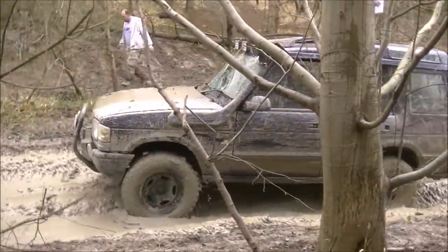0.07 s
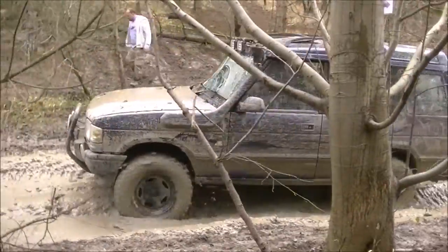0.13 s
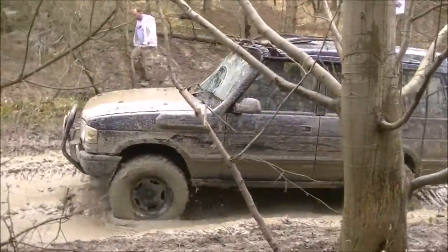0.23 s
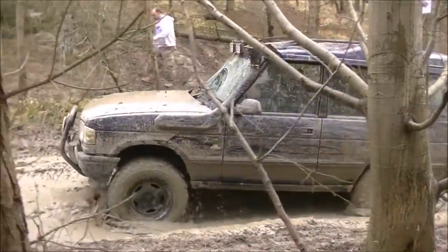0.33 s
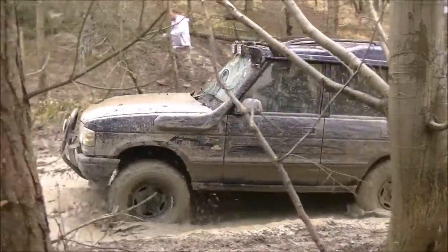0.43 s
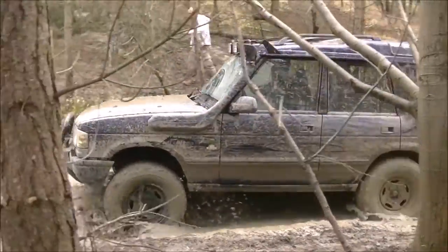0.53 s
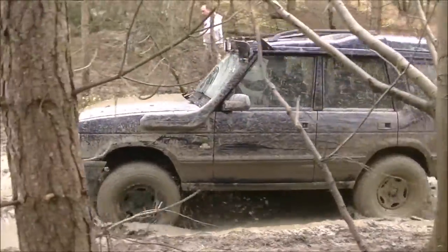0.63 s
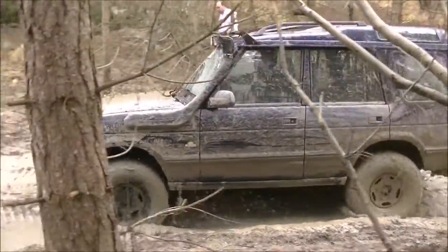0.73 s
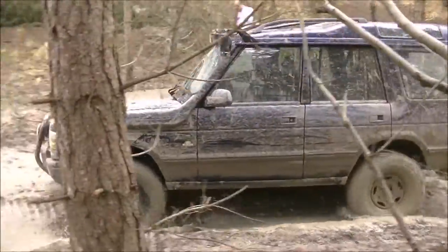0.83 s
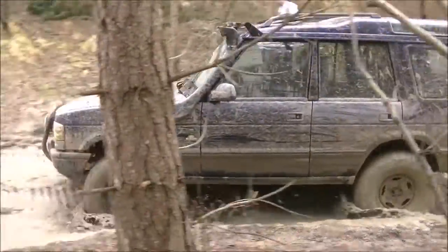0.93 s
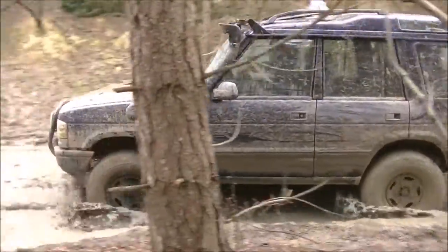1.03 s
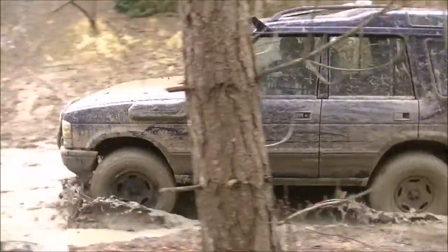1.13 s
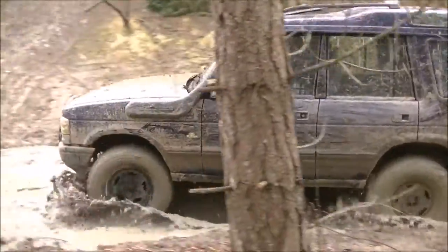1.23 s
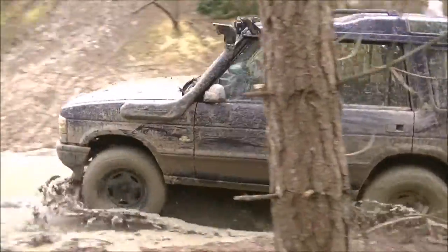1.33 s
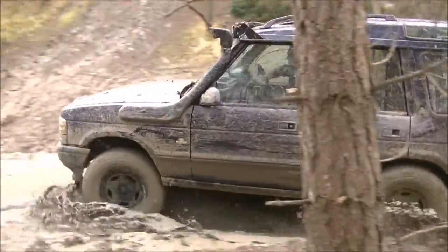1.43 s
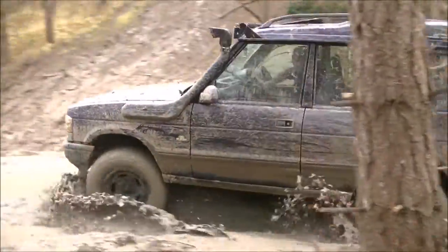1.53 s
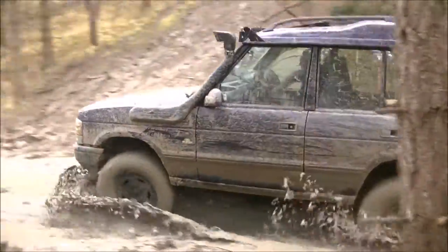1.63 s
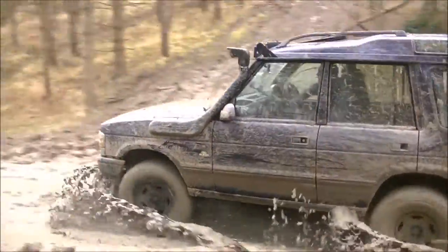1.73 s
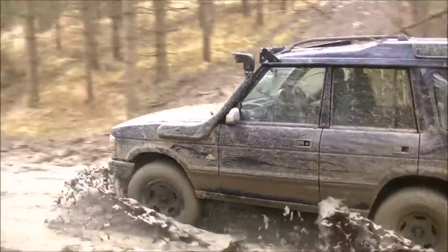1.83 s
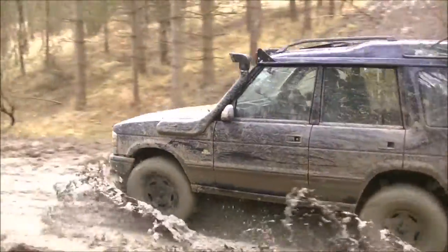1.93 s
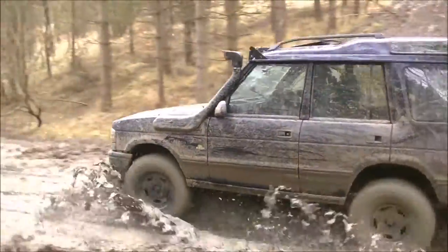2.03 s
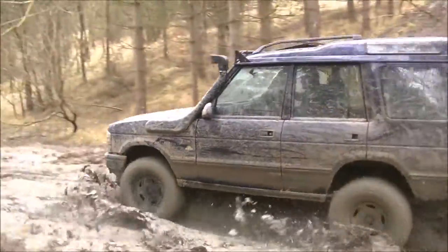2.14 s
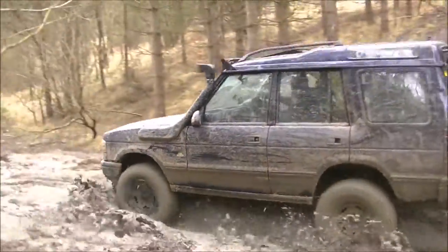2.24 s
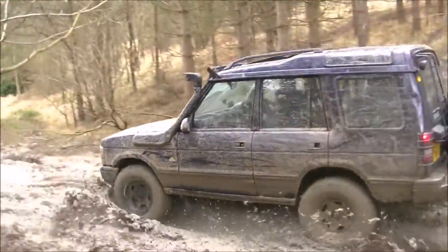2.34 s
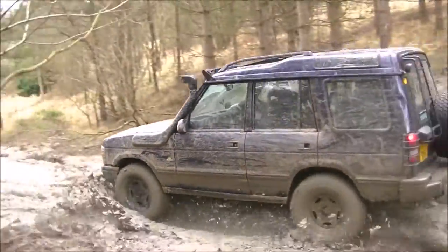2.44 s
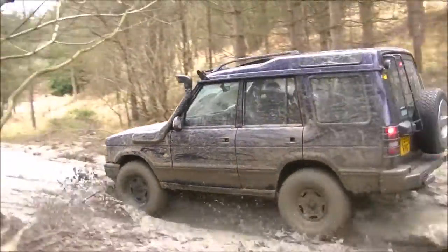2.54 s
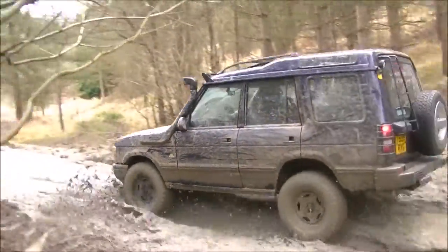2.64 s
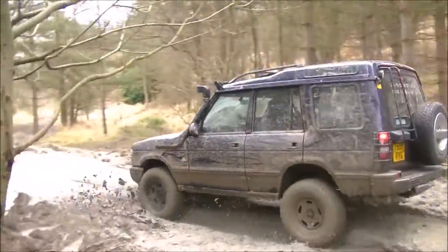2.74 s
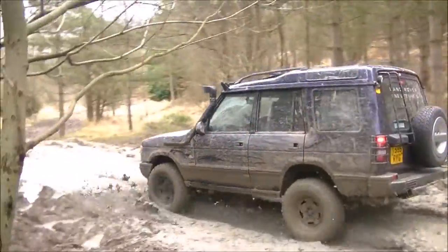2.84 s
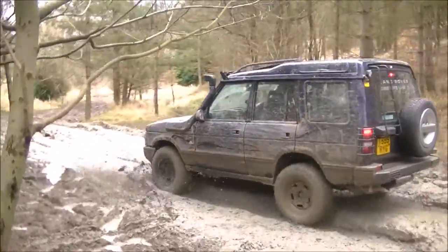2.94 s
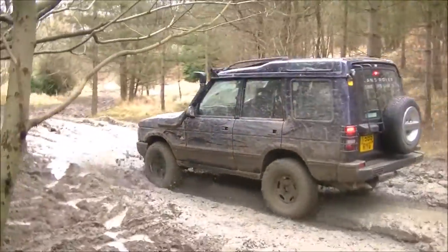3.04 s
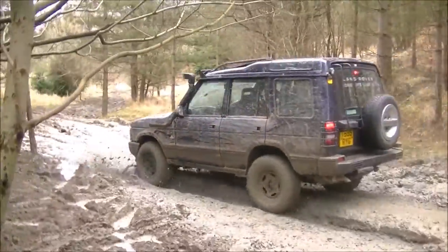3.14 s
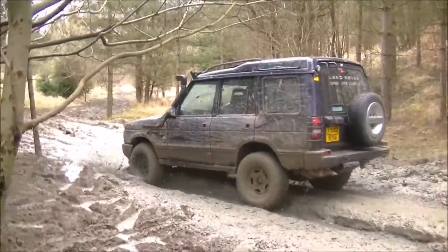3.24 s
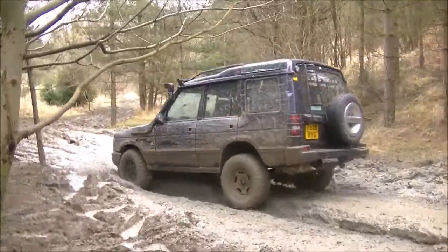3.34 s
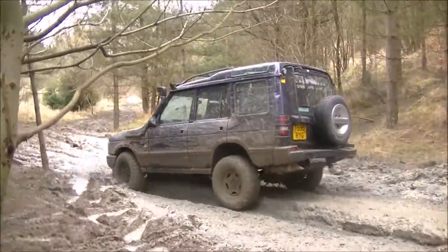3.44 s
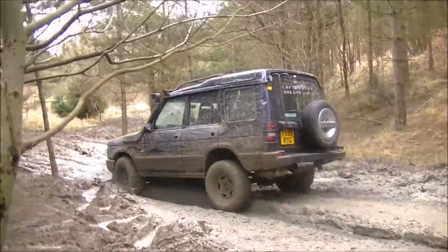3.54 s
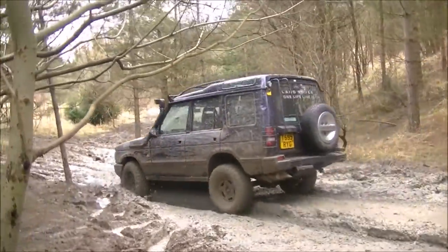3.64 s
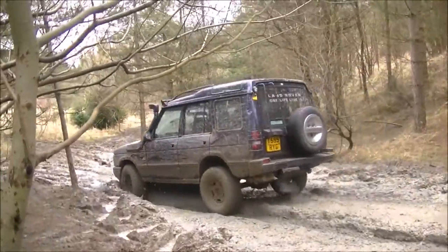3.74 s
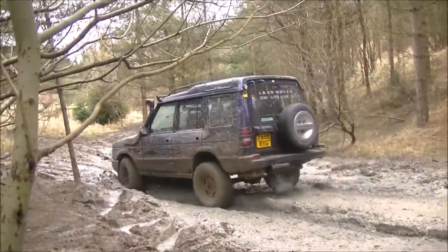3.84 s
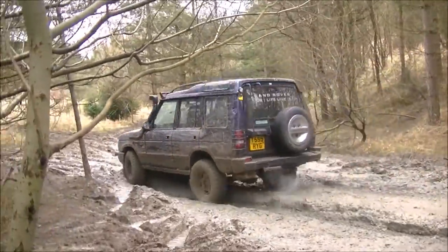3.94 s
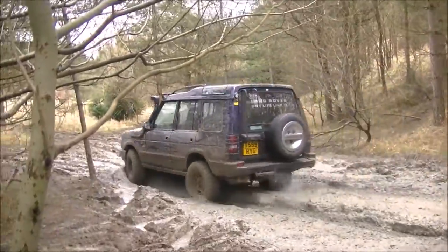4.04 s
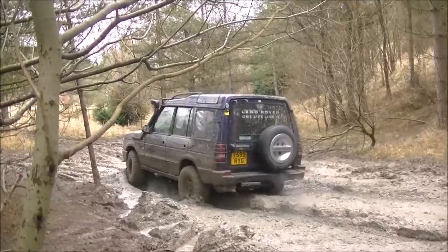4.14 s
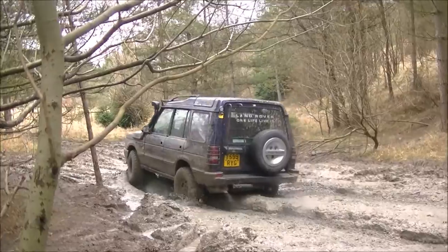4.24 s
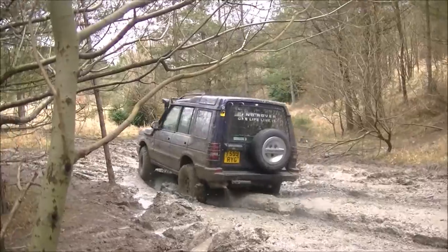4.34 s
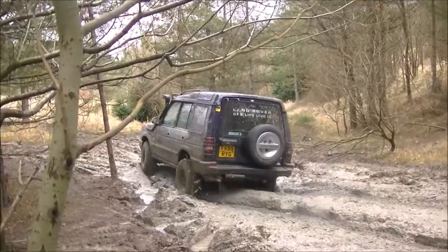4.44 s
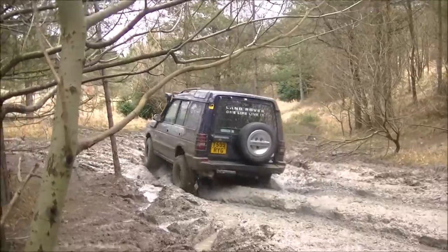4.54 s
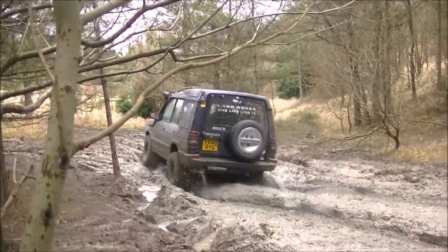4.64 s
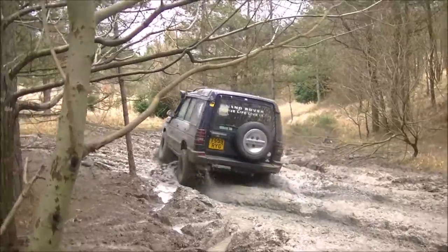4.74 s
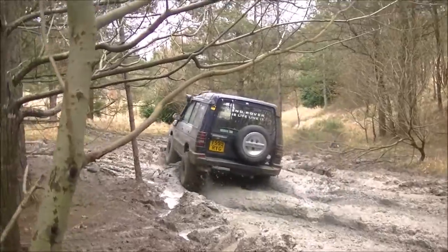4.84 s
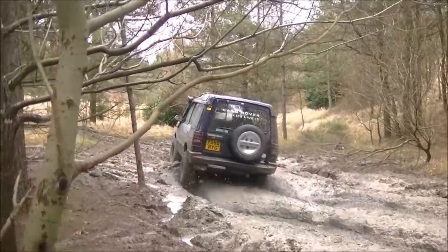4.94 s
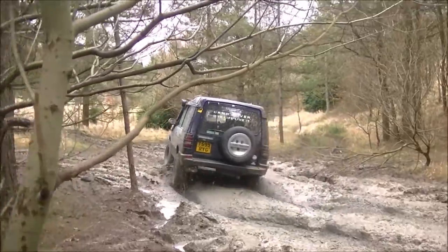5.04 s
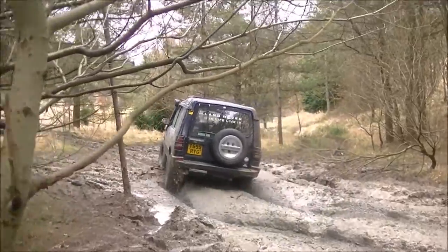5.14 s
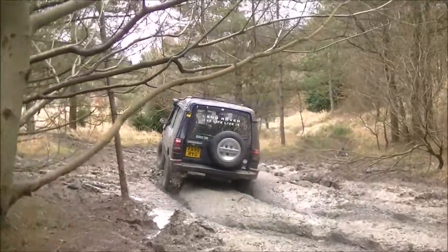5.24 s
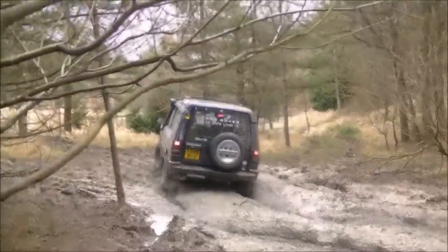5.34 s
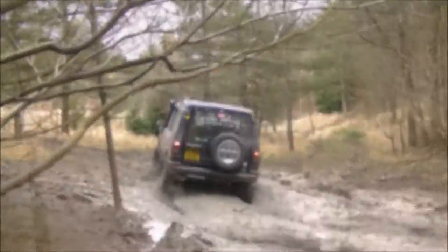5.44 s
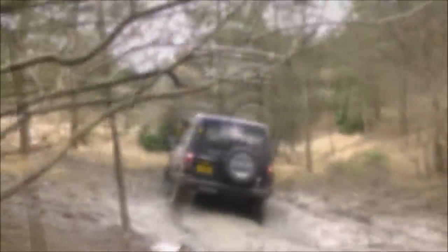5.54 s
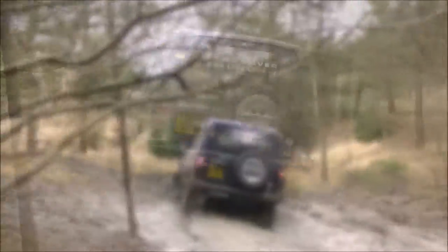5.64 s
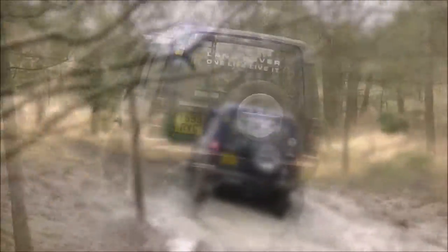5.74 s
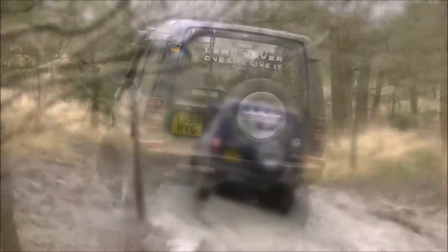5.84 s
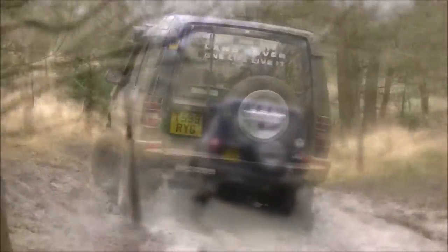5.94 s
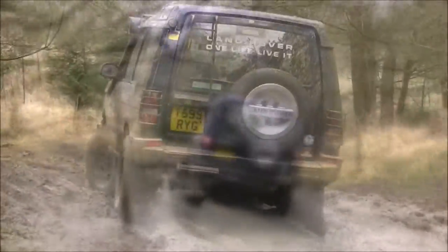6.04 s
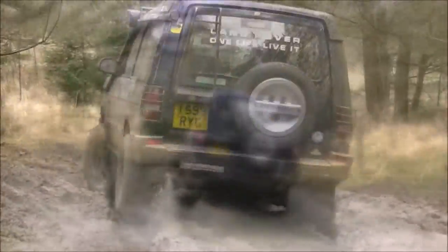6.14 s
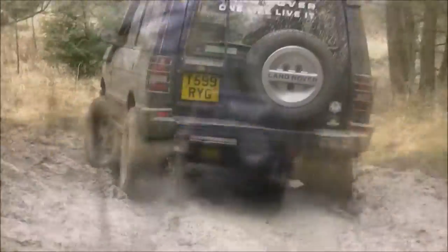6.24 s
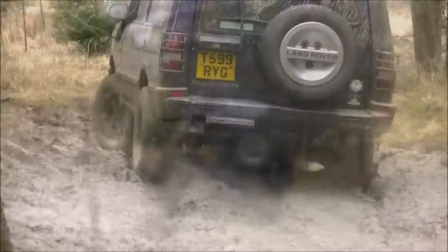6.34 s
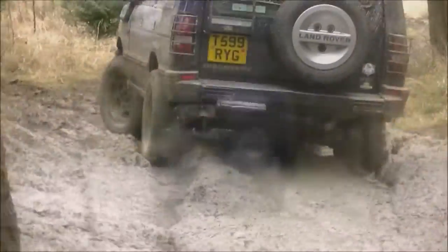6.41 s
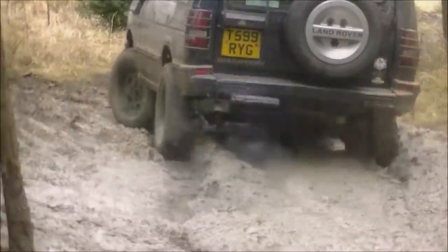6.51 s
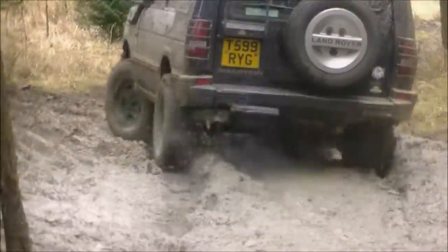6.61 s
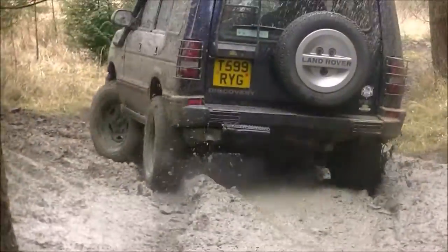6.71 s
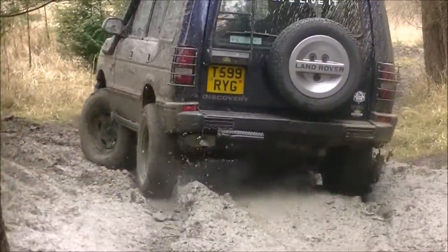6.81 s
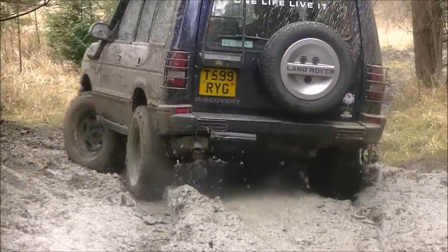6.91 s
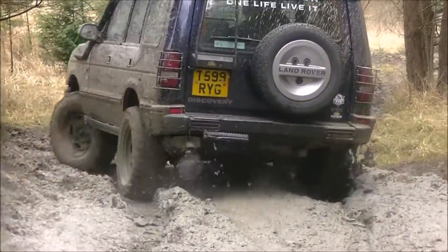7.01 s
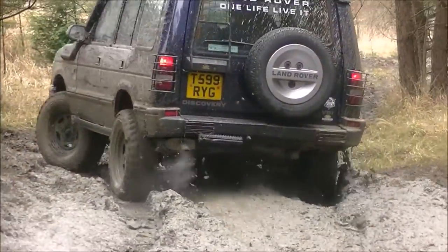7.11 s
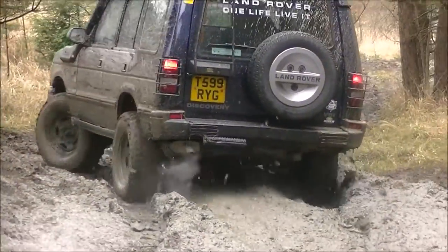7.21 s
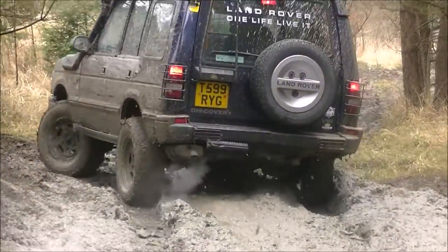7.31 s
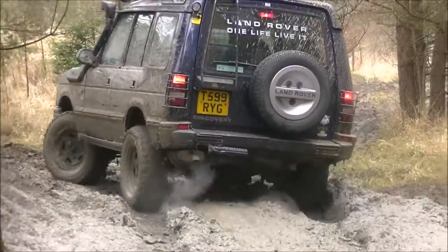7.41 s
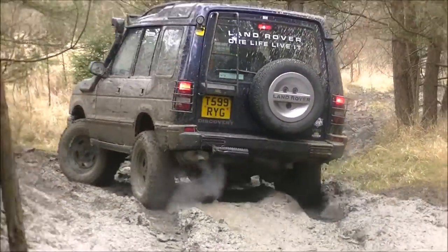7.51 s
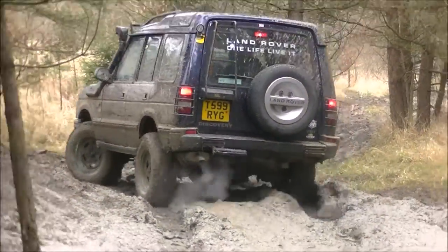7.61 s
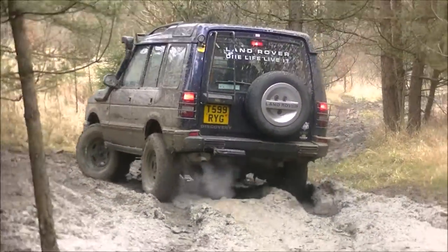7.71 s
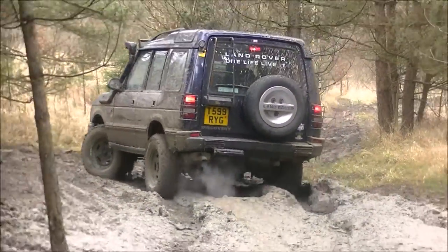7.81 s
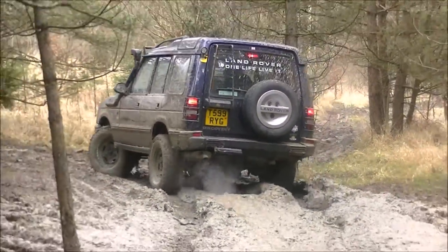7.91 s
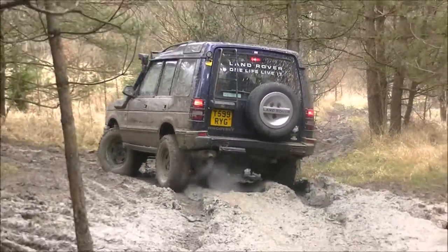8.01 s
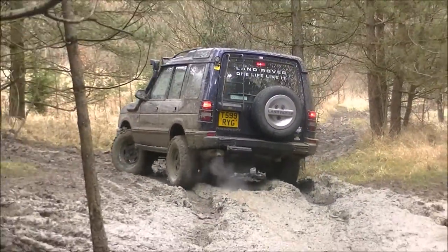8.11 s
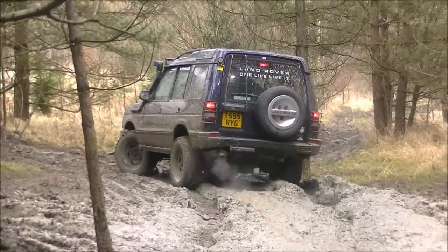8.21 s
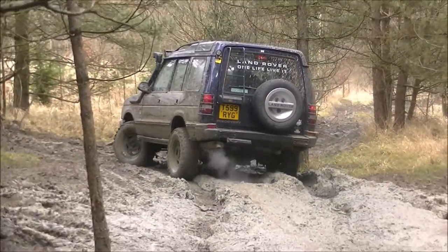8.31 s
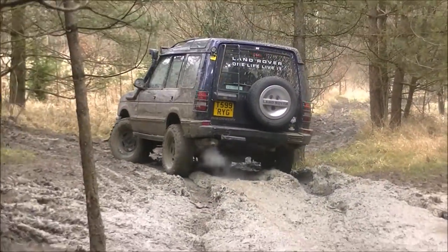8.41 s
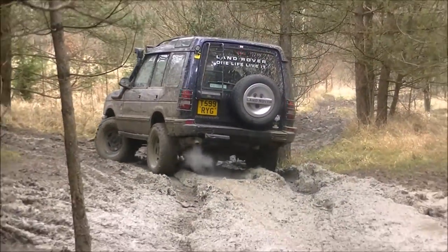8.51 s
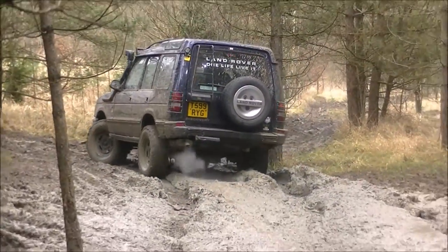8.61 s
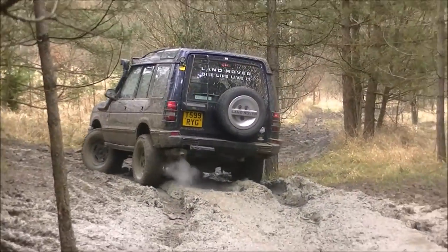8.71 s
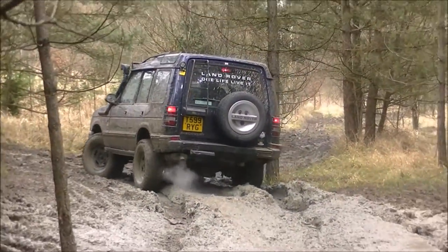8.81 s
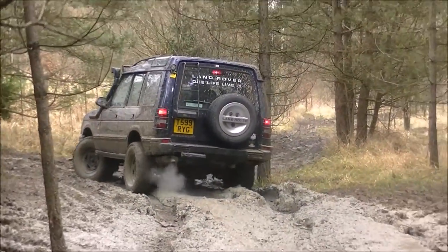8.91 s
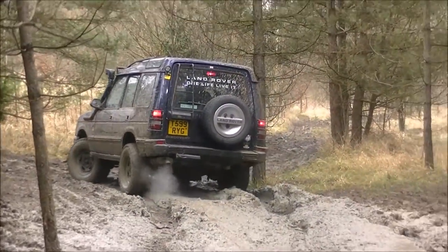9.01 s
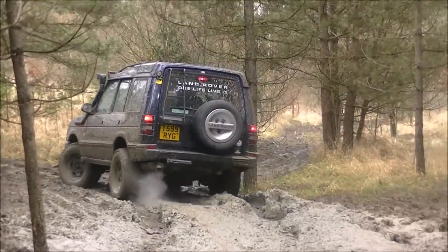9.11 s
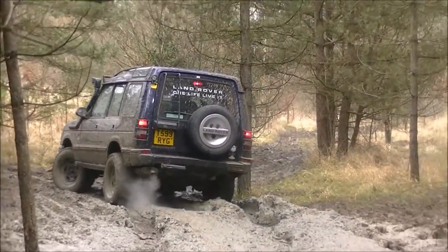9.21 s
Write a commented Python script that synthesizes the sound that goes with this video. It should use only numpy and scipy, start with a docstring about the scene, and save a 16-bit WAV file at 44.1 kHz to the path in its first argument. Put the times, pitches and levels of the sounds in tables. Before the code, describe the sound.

An off-road vehicle churns through deep mud and water on a woodland track. Its engine swells three times with a rushing, whining roar, while the tyres throw up hissing spray and clods slap down. The first surge is the wettest. A few sharp ticks sound close to the microphone. Finally the engine sinks to a quiet idle further away, with light spatters and a faint sizzle.

```python
"""A V8 four-wheel-drive roars three times through hissing mud in a wood, then idles further up the track.
Its cylinders fire into a ringing exhaust pipe, and its cooling fan rushes and whines with the revs.
The tyres churn up spray, clods and stones slap down, air pockets gulp and the body thuds over ruts.
Near the end, water sizzles on the hot exhaust. A few sharp ticks and a soft brush sound close by."""
import sys
import numpy as np
from scipy import signal
from scipy.fft import rfft, irfft, next_fast_len
from scipy.io import wavfile
from scipy.ndimage import uniform_filter1d, map_coordinates

SR = 44100
rng = np.random.default_rng(int(sys.argv[2]) if len(sys.argv) > 2 else 0)


def int16_out(signal):
    """Quantize to a 16-bit WAV file."""
    q = np.round(np.clip(np.atleast_2d(signal).T, -1, 1) * 32767)
    wavfile.write(sys.argv[1], SR, q.astype(np.int16))


N = 408366
TIME = np.arange(N) / SR


def engine():
    """Exhaust, fan and drone follow the revs; the rush and the drone also fade with distance."""
    # how fast the crankshaft spins: t/s, speed/(turns a second)
    revs = [(0, 37.5), (.25, 39.5), (.5, 39), (.75, 42), (1.1, 48.8), (1.25, 51.5), (1.47, 57), (1.62, 58),
            (1.8, 62), (1.93, 59), (2.15, 47), (2.5, 38), (3, 27), (3.85, 20), (4.1, 39), (4.45, 47.3),
            (4.75, 51), (4.96, 52.3), (5.1, 50.5), (5.38, 27), (5.65, 40), (5.9, 49.5), (6.25, 54.3),
            (6.75, 58), (6.92, 55), (7.15, 41.5), (7.55, 15.4), (9.26, 15.3)]
    # the drive past and away: t/s, distance/m, tail (0 side-on, 1 seen from behind)
    route = [(0, 5.7, 0.85), (1.4, 4.8, 0.02), (3, 6.6, 0), (4.4, 7.3, 0.54), (4.95, 8.4, 0.55),
             (5.5, 13.5, 0.8), (6.8, 10.6, 1), (9.26, 43, 1)]
    # strength of the drone, which follows the throttle: t/s, relative level/dB
    drone_levels = [(0, -7), (.8, -7), (1.25, -1.5), (1.75, 0), (2, -5), (2.5, -10), (4.1, -7),
                    (4.45, -0.5), (4.7, 2), (4.85, -11), (5.5, -12), (5.9, -7), (6.3, -1), (6.8, 2),
                    (6.95, -4), (7.1, -15)]
    speed, = curves(revs)
    metres, tail = curves(route)
    drone_db, = curves(drone_levels)
    full_load_hz, near_m = 44.9, 6
    load = np.clip(speed / full_load_hz, 0, 1) ** 2
    climb_hz_per_s = uniform_filter1d(np.gradient(speed) * SR, size=int(0.82 * SR))
    throttle = np.tanh(climb_hz_per_s / 9.3)  # rising revs mean an open throttle
    fan_db = -29 + 11 * np.log2(speed / full_load_hz) + 1.25 * throttle
    wheel_slip = 0.006 * load * wobble(30)  # the revs waver as the wheels grip and slip
    turns = np.cumsum(speed * (1 + wheel_slip)) / SR
    hum = load * drone(turns, speed, tail, drone_db)
    whine = fan_whine(turns)
    air = fan_and_intake(tail, drone_db) + bay_roar(tail, load)
    return exhaust(turns, load) + whine + near_m / metres * amp(fan_db) * (air + hum)


def exhaust(turns, load):
    """Four firings a turn ring the pipe; under load, rushing gas turns the beat into a rasp."""
    # strength of each of the eight firings in one cycle
    cylinders = [0.58, 1.2, 0.91, 1.2, 0.65, 0.44, 1.6, 1.1]
    # the pipe's rings: f/Hz, width/Hz, relative level/dB
    pipe_rings = [(187, 34, 10), (307, 27, 8), (430, 97, -6)]
    # the exhaust as the listener hears it: t/s, level/dB
    levels = [(0, -63), (2.3, -58), (2.9, -59.5), (3.7, -62), (4.4, -58), (4.95, -57), (5.4, -53.5),
              (6, -52), (6.9, -52), (7.5, -57.5), (8.3, -57.5), (9.26, -57)]
    level_db, = curves(levels)
    firings = np.searchsorted(turns, np.arange(1, int(4 * turns[-1])) / 4)
    sizes = np.resize(cylinders, len(firings)) * (1 + 0.15 * rng.standard_normal(len(firings)))
    pulses = unit(np.bincount(firings, sizes, N)[:N])
    gas = (0.6 + 5 * load ** 2) * rng.standard_normal(N)
    note = high_pass(ringing(pulses + gas, pipe_rings), edge_hz=170)
    running_level = np.sqrt(np.abs(uniform_filter1d(note ** 2, size=12000)))
    return amp(level_db) * note / running_level


def fan_and_intake(tail, drone_db):
    """The fan rushes and the air intake howls; the howl is strongest from behind."""
    # tone colour of the fan: f/Hz, level/dB
    fan_colour = [(30, -69), (110, -41), (180, -27.5), (300, -13), (390, -11), (470, -5), (560, -2),
                  (740, -1), (860, -2.5), (1000, -3), (1600, -6.5), (4000, -31.5), (16000, -53)]
    # the intake's rings: f/Hz, width/Hz, relative level/dB
    intake_rings = [(466, 34, 5), (663, 33, -2)]
    howl = unit(high_pass(ringing(rng.standard_normal(N), intake_rings), edge_hz=327))
    howl_gain = amp(-21 + 16.5 * tail + 0.16 * drone_db)
    return (rush(fan_colour, patchy_db=1.5) + howl_gain * howl) / np.hypot(1, howl_gain)


def fan_whine(turns):
    """Eleven fan blades chop the air into a whine that comes and goes."""
    # strength of the whine: t/s, level/dB
    levels = [(0, -42), (.25, -36), (.45, -42), (.72, -37), (1, -44), (1.3, -27.5), (1.6, -35), (1.88, -26),
              (2.15, -39), (3.8, -72), (4.45, -40), (4.75, -47), (4.9, -34), (5.03, -34.5), (5.25, -60),
              (5.5, -62), (5.7, -39), (5.98, -44), (6.22, -30.5), (6.5, -42), (6.8, -33.5), (7, -40),
              (7.12, -37), (7.32, -70)]
    level_db, = curves(levels)
    return amp(level_db + 2.5 * wobble(20)) * gruff_tone(turns, multiple=11)


def drone(turns, speed, tail, drone_db):
    """Tones at multiples of the crank speed; the body favours different ones from side and rear."""
    # the tones: cycles per turn of the crank
    multiples = [5, 6, 8, 9, 10, 12, 13, 14]
    # strength of each tone: relative level/dB
    strengths = [-1.5, -6, -0.5, -4, -6, -8, -1.5, -7.5]
    # how the body passes each pitch: f/Hz, side-on gain/dB, rear gain/dB
    body_gains = [(196, -26.5, -14.5), (280, -15, -23), (330, -16.5, -10), (375, -16, -12),
                  (430, -8.5, -11.5), (470, -16, -7.5), (520, -13, -8), (586, -2, -18), (640, -13, -6),
                  (740, -11, -14), (820, -12, -17)]
    hz, side_db, rear_db = np.transpose(body_gains)
    out = np.zeros(N)
    for multiple, db in zip(multiples, strengths):
        pitch = multiple * speed
        body_db = (1 - tail) * np.interp(pitch, hz, side_db) + tail * np.interp(pitch, hz, rear_db)
        out += amp(db + drone_db + body_db + 3.3 * wobble(16)) * gruff_tone(turns, multiple)
    return out


def gruff_tone(turns, multiple):
    """One engine tone, shaken in strength and timing by uneven burning."""
    shake = 1 + 0.33 * wobble(110)
    stray_turns = 0.0055 * wobble(55)
    return shake * np.sin(2 * np.pi * multiple * (turns + stray_turns))


def bay_roar(tail, load):
    """The engine bay rings with a roar, heard side-on when the engine works hard."""
    roar = noise_band(rng.standard_normal(N), hz=760, width_hz=170)
    return amp(-7.5) * (1 - tail) * load ** 2 * roar


def mud():
    """The treads churn mud and fling it out as lumps, drops and mist; the wetter, the brighter."""
    # how hard the tyres work the mud, as the listener hears it: t/s, relative level/dB
    churning = [(0.0, -27.5), (0.15, -23), (0.42, -20.5), (0.65, -20.5), (1.25, -14.5), (2.385, -14),
                (2.415, -16.5), (2.5, -14.5), (2.65, -17.5), (2.9, -17.5), (3.25, -23.5), (3.55, -23.5),
                (3.9, -25.5), (4.7, -21.5), (5.15, -22), (5.38, -26.5), (5.85, -30.5), (6.05, -26.5),
                (6.88, -26), (7.3, -34), (7.6, -42), (8.2, -48.5), (9.26, -50.5)]
    # what the treads throw: t/s, wetness (0 stiff mud, 1 muddy water)
    wetness = [(0, 0.65), (2.3, 0.87), (3.4, 0.8), (4.25, 0.26), (5.05, 0.2), (5.45, 0.64), (6.4, 0.069),
               (6.9, 0.14), (7.5, 0.73), (8.3, 0.71)]
    # tone colours of the churn, the spray and the mist: f/Hz, level/dB
    churn_colour = [(100, -98), (180, -36), (270, -17.5), (380, -25.5), (500, -11), (900, -7.5), (1400, -3),
                    (2000, -0.5), (2600, 0), (3300, -7.5), (5000, -9.5), (16000, -44.5)]
    spray_colour = [(300, -81), (1800, -27), (3200, 4.5), (4400, 4.5), (5500, -4), (8000, -8), (11000, -21),
                    (16000, -19)]
    mist_colour = [(1000, -32), (4500, -31), (6500, -4), (8000, -1), (10000, -6), (12500, -6.5),
                   (16000, -4)]
    churning_db, = curves(churning)
    wet, = curves(wetness)
    in_pool = np.clip(0.5 - (TIME - 2.03) / 0.79, 0, 1)  # the wheels climb out around 2 s
    # Single lumps stand out when the flow is thin; the pool's water swallows them.
    lumps_db = np.minimum(-12 - 0.22 * churning_db, -5) - 14 * in_pool
    surge_db = 0.51 * wobble(22)  # the treads bite unevenly
    lumps = amp(lumps_db - 2.5) * patter(per_s=270, centre_hz=2060, spread=0.31, uneven_db=9.5)
    drops = amp(lumps_db + 1) * patter(per_s=700, centre_hz=4100, spread=0.2, uneven_db=12.5)
    droplets = amp(lumps_db) * patter(per_s=1600, centre_hz=8300, spread=0.17, uneven_db=4.5)
    churn = amp(-2 - 2.5 * wet) * (rush(churn_colour, patchy_db=1.1) + lumps)
    spray = amp(-6 + 2 * wet) * (rush(spray_colour, patchy_db=0.95) + drops)
    mist = amp(-11.5 + 8 * wet) * (rush(mist_colour, patchy_db=2.1) + droplets)
    return amp(churning_db + surge_db) * (churn + spray + mist)


def patter(per_s, centre_hz, spread, uneven_db):
    """Many soft wet splats, each a wave or two long and of very unequal size."""
    count = int(per_s * N / SR)
    when, rank = rng.random((count, 2)).T
    hz = np.clip(centre_hz * np.exp(spread * rng.standard_normal(count)), 600, 15000)[:, None]
    sizes = amp(-uneven_db * np.log(np.maximum(rank, 0.035)))[:, None]
    samples = np.arange(220)
    cycles = hz * samples / SR
    splats = sizes * np.sin(2 * np.pi * cycles) * cycles * np.exp(-2 * cycles)
    places = (when * N).astype(int)[:, None] + samples
    out = np.bincount(places.ravel(), splats.ravel(), N)[:N]
    return unit(high_pass(out, centre_hz / 4))


def clods():
    """Clods and stones slap down; wet mud lands softly, so the treble is turned down."""
    # landings: t/s, relative level/dB, f/Hz, time for the spatter to die/s
    landings = [(2.461, -6.5, 2100, 0.044), (2.719, -19, 2220, .03), (2.86, -8.5, 1900, .06),
                (2.9, -7, 1950, 0.055), (2.929, -8, 2330, 0.044), (2.997, -7.5, 2300, .04),
                (3.504, -12, 2220, .025), (4.083, -9.5, 1860, 0.046), (4.102, -10, 2400, .08),
                (4.1245, -3.5, 2100, .025), (4.139, -18, 1700, .06), (4.26, -13, 724, 0.037),
                (4.28, -15, 760, 0.066), (4.524, -12, 1010, 0.036), (4.7, -13, 940, 0.045),
                (4.841, -12.5, 910, 0.066), (5.04, -6.5, 2200, .05), (5.057, -16, 2060, 0.055),
                (5.202, -12, 2270, 0.032), (5.938, -19, 900, 0.018), (6.986, -17, 1940, .03),
                (7.213, -16.5, 1840, .025), (7.344, -22, 2370, .025), (7.373, -19.5, 2780, .025),
                (7.398, -23, 2000, .06), (7.623, -27, 1810, .05), (7.681, -23, 3500, .015),
                (7.696, -27, 2000, .06), (7.795, -33, 1940, .02), (7.852, -31, 1900, .03),
                (7.8835, -23.5, 1610, 0.0092), (8.112, -35, 1900, .02), (8.134, -25.5, 2090, 0.0088),
                (8.201, -34, 3800, .015), (8.258, -28, 4200, .012), (8.321, -40, 1500, .02),
                (8.581, -34, 3000, .04), (8.655, -29.5, 3400, 0.015), (8.672, -29, 3160, .04),
                (8.849, -28.5, 3380, 0.035), (9.075, -35, 3180, .015), (9.178, -31.5, 1440, .015)]
    slaps = amp(16) * blows(landings, low_cut_ratio=0.34, splash=0.69)
    return coloured(slaps, [(2500, 1.5), (5000, -4), (12000, -10)])


def thuds():
    """The body thuds dully over ruts."""
    # bumps: t/s, relative level/dB, f/Hz, time to die away/s
    bumps = [(.99, -23, 252, .05), (3.6, -36, 280, .05), (4.69, -29, 217, .05), (9.228, -39, 400, .05)]
    return amp(18.5) * blows(bumps, low_cut_ratio=0.91, splash=1.2)


def blows(rows, low_cut_ratio, splash):
    """Each blow is one push and a ragged tail of spatters, ringing broadly around its own pitch."""
    out, t = np.zeros(N + SR), np.arange(4096) / SR
    spatters_per_s = 2500
    for start, db, hz, fade_s in rows:
        spatters = rng.standard_normal(len(t)) * (rng.random(len(t)) < spatters_per_s / SR)
        burst = (t == 0) + splash * spatters * amp(-60 * t / fade_s)
        ring = filtered(burst, lambda f: resonance(f, hz, 0.65 * hz))
        hit = high_pass(ring, hz * low_cut_ratio)
        out[round(start * SR):][:len(t)] += amp(db) * hit / np.linalg.norm(hit)
    return out[:N]


def ticks():
    """Each close tick is a bare crack and two broad rings, with a very short rattle after it."""
    # ticks: t/s, relative level/dB, main f/Hz, second f/Hz, second against main/dB
    snaps = [(4.8124, -1, 3420, 5060, 1), (4.8584, -10.5, 3460, 5030, 2), (4.977, -9, 2700, 4570, -5),
             (5.8425, -0.5, 3540, 6600, 1), (6.137, -5, 3260, 7340, -3), (6.1704, -4.5, 3400, 5030, 2),
             (6.8146, -7.5, 4100, 10400, -7), (7.9927, -12.5, 4500, 2380, -6),
             (8.0455, -5.5, 4100, 6240, -4), (9.178, -21.5, 7600, 10500, -4)]
    out, t = np.zeros(N + SR), np.arange(2048) / SR
    rattle_s, crack_db = 0.0098, -15
    for start, db, main_hz, second_hz, second_db in snaps:
        burst = (t == 0) + 0.14 * rng.standard_normal(len(t)) * amp(-60 * t / rattle_s)
        width_hz = 0.27 * main_hz
        rings = ringing(burst, [(main_hz, width_hz, 0), (second_hz, width_hz, second_db)])
        snap = high_pass(rings + amp(crack_db) * burst, edge_hz=0.53 * main_hz)
        out[round(start * SR):][:len(t)] += amp(db) * snap / np.linalg.norm(snap)
    return amp(13.5) * out[:N]


def gulps():
    """Air pockets in the mud ring hollowly for a moment as they open."""
    # air pockets: t/s, level/dB, f/Hz
    pockets = [(1.82, -26, 915), (2.25, -27, 790), (7.58, -52, 610), (7.745, -55, 660)]
    noise = rng.standard_normal(N)
    return sum(amp(db) * swell(s, half_length_s=0.035) * noise_band(noise, hz, width_hz=80)
               for s, db, hz in pockets)


def sizzle():
    """Water on the hot exhaust steams with a fine hiss and tiny spits."""
    # strength of the sizzle: t/s, level/dB
    levels = [(6.6, -64), (7.4, -47), (8.25, -53), (8.7, -58), (9.26, -69)]
    # tone colour of the steam: f/Hz, level/dB
    steam_colour = [(2000, -38), (3700, -9), (4450, -4), (5200, -9), (8000, -19), (16000, -35)]
    level_db, = curves(levels)
    hiss = rush(steam_colour, patchy_db=7)
    spits = amp(-2) * patter(per_s=150, centre_hz=4400, spread=0.078, uneven_db=11)
    return amp(level_db) * (hiss + spits)


def brush():
    """One soft brush close by: a brief swell of bright noise."""
    hiss = rush([(500, -23), (2500, 0), (7000, 1), (16000, -17)], patchy_db=1.2)
    return amp(-42.5) * swell(middle_s=9.015, half_length_s=0.043) * hiss


def wood_echo(x, fade_s):
    """Tree trunks scatter a thin, short echo."""
    t = np.arange(SR // 3) / SR
    tail = rng.standard_normal(len(t)) * amp(-60 * t / fade_s)
    echo = signal.fftconvolve(x, tail / np.linalg.norm(tail))[:N]
    return coloured(echo, [(200, -1), (1000, -4), (2200, -3), (4400, -3), (8000, 4.5), (11500, -27.5)])


def still_air():
    """The faint, low hush of the wood."""
    # tone colour of the hush: f/Hz, level/dB
    air_colour = [(30, -4), (110, 0), (300, -6), (2000, -18), (16000, -40)]
    return amp(-82) * rush(air_colour, patchy_db=1.5)


def amp(db):
    """Turn decibels into a gain to multiply by."""
    return 10 ** (np.asarray(db) / 20)


def unit(x):
    """Scale x to an average strength (rms) of 1."""
    return x / np.sqrt(np.mean(x ** 2) + 1e-20)


def curves(rows):
    """Join a table's points with lines: one value per sample for each column after the time."""
    times, *columns = np.transpose(rows)
    return [np.interp(TIME, times, column) for column in columns]


def swell(middle_s, half_length_s):
    """A bell-shaped rise and fall."""
    return np.exp(-((TIME - middle_s) / half_length_s) ** 2)


def wobble(per_s):
    """A smooth curve through per_s random values a second."""
    return map_coordinates(rng.standard_normal(int(N * per_s / SR) + 4), [TIME * per_s])


def rush(colour, patchy_db):
    """Noise of the given tone colour, with random louder and softer patches in time and pitch."""
    spectra = signal.stft(rng.standard_normal(N), nperseg=512)[2]
    patches = uniform_filter1d(rng.standard_normal(spectra.shape), size=7, axis=0)
    patches = uniform_filter1d(patches, size=8, axis=1)
    noise = signal.istft(spectra * amp(patchy_db * unit(patches)), nperseg=512)[1][:N]
    return unit(coloured(noise, colour))


def filtered(x, response):
    """Multiply each frequency f in x by response(f)."""
    n = x.shape[-1]
    padded = next_fast_len(n + 8192)
    return irfft(rfft(x, padded) * response(np.fft.rfftfreq(padded, 1 / SR)), padded)[..., :n]


def coloured(x, points):
    """Shape the tone colour of x by points of f/Hz, gain/dB."""
    f, db = np.transpose(points)
    hz = np.fft.rfftfreq(8192, 1 / SR)
    cepstrum = irfft(np.log(amp(np.interp(np.log(hz + 1), np.log(f), db))))
    # Fold the second half onto the first, so the filter never rings ahead of a sound.
    cepstrum[1:len(hz) - 1] *= 2
    cepstrum[len(hz):] = 0
    return signal.fftconvolve(x, irfft(np.exp(rfft(cepstrum))))[:len(x)]


def resonance(f, centre, width):
    """How a thing that rings at centre answers frequency f; a narrow width rings longer."""
    return 1j * f * width / (centre ** 2 - f ** 2 + 1j * f * width)


def ringing(x, rings):
    """Let x set off several rings at once, each given as f/Hz, width/Hz, gain/dB."""
    return filtered(x, lambda f: sum(amp(db) * resonance(f, hz, width) for hz, width, db in rings))


def noise_band(noise, hz, width_hz):
    """Narrow a noise to a hollow ring around one pitch."""
    return unit(filtered(noise, lambda f: resonance(f, hz, width_hz) ** 2))


def high_pass(x, edge_hz):
    """Cut the bass: small things give off next to nothing far below their pitch."""
    return signal.sosfilt(signal.butter(4, np.clip(edge_hz, 30, 9000), 'high', fs=SR, output='sos'), x)


def scene():
    """The vehicle stays straight ahead and echoes from the sides; the close sounds have no echo."""
    vehicle = clods() + thuds() + engine() + mud() + gulps() + sizzle()
    side = amp(-12.5) * wood_echo(vehicle, fade_s=0.23)
    middle = vehicle + still_air() + brush() + ticks()
    return np.array([amp(-0.15) * middle + side, amp(0.15) * middle - side])


def record(dry):
    """The microphone's openings ring in the treble; loud peaks are cut off and bend a little unevenly."""
    # tone colour of the microphone: f/Hz, gain/dB
    microphone = [(3000, 0), (3700, 0.5), (4450, 5), (4900, 0.5), (5400, -4), (6000, -2.5), (6600, -6.5),
                  (8000, -1.5), (9500, -7), (10800, -10), (12000, -3.5), (16000, -14)]
    heard = np.clip([coloured(channel, microphone) for channel in dry], -1, 1)
    bent = heard + 0.046 * heard ** 4
    return filtered(bent, lambda hz: (hz > 10) * (hz < 16000))


dry = scene()
out = record(dry)
int16_out(out)
```